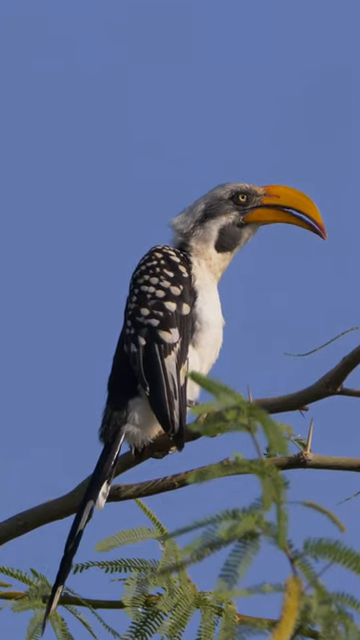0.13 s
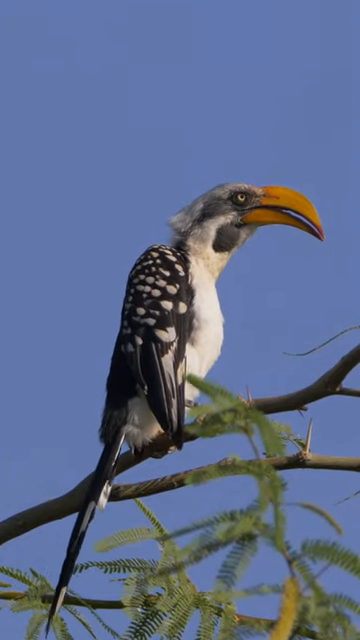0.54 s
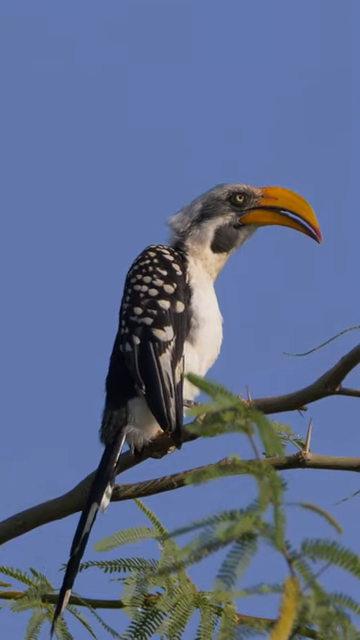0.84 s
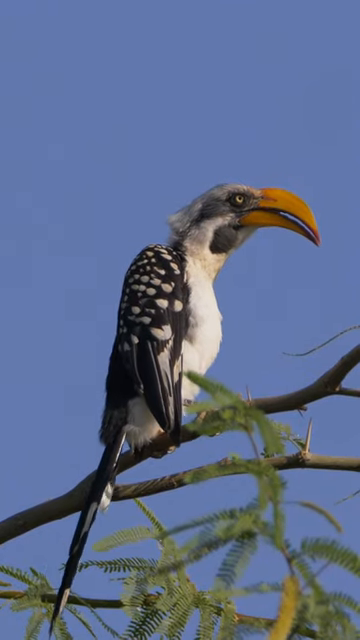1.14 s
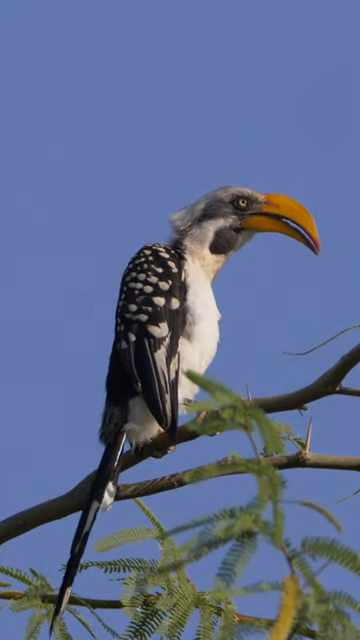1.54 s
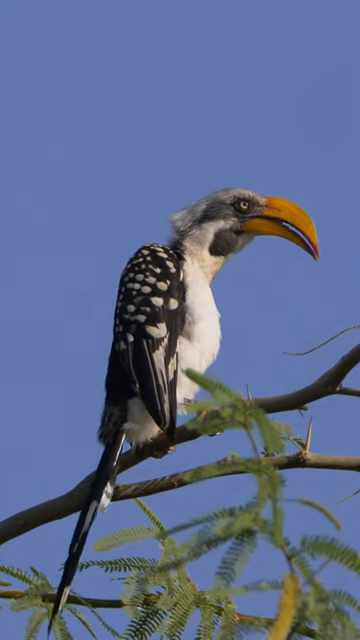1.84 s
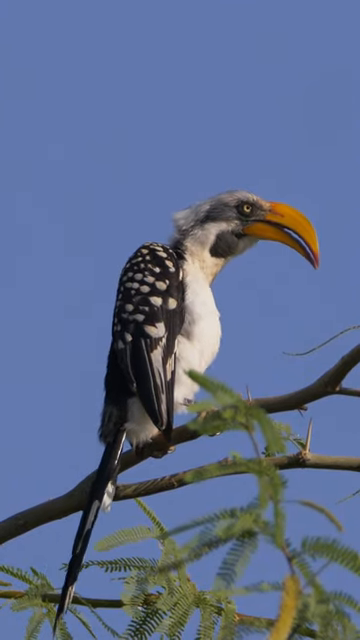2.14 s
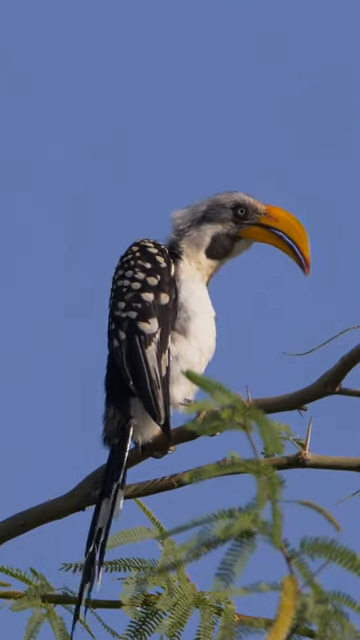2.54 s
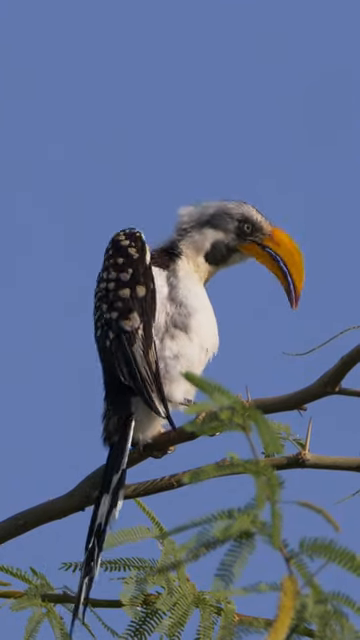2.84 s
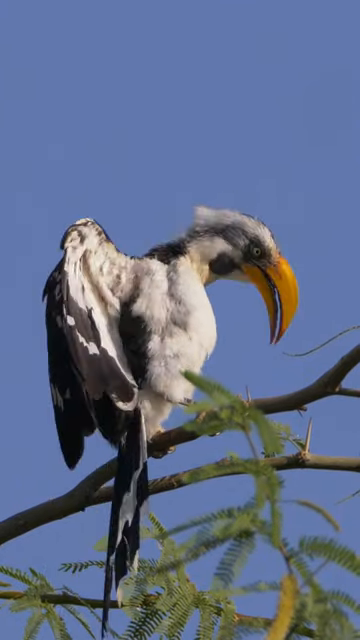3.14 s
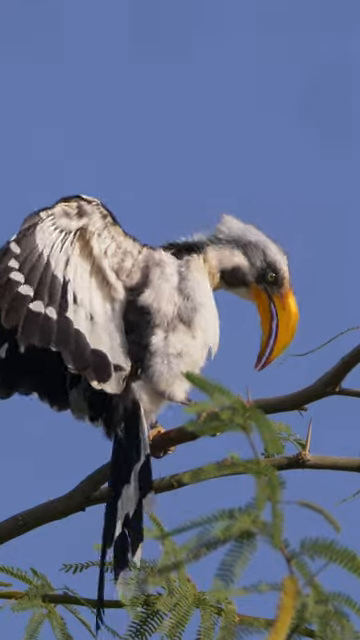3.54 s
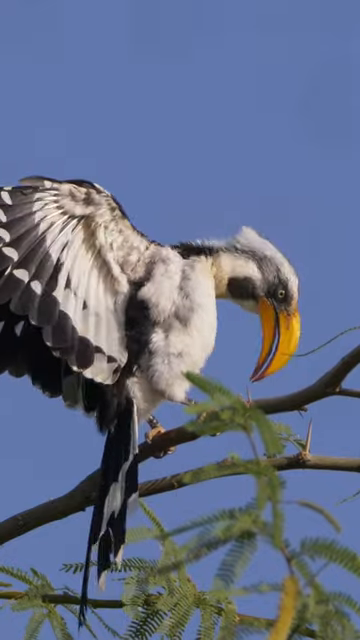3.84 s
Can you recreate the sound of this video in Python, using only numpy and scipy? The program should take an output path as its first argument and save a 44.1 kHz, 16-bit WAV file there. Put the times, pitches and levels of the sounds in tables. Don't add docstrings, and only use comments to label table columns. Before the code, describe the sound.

A hornbill close to the microphone gives hoarse low clucks, about six a second, growing slightly louder; a second, lower and clearer bird joins in, with small birds chirping farther off in open bush.

```python
import sys
import numpy as np
from scipy import signal
from scipy.fft import rfft, irfft
from scipy.io import wavfile
from scipy.ndimage import uniform_filter1d

SR = 44100
rng = np.random.default_rng(int(sys.argv[2]) if len(sys.argv) > 2 else 0)


def inscribe(sig):
    pcm = np.round(np.clip(np.atleast_2d(sig).T, -1, 1) * 32767)
    wavfile.write(sys.argv[1], SR, pcm.astype(np.int16))


def invert_db(x):
    u = np.asarray(x, float) / 20
    return 10 ** u


N = 176400


def at_hz(points, hz):
    curve_hz, curve_db = np.array(points)[:, 0], np.array(points)[:, 1]
    return np.interp(np.log(hz + 1), np.log(curve_hz), curve_db, right=-70)


def over_time(points):
    return np.interp(np.arange(N) / SR, *np.transpose(points))


def rms_one(x):
    return x / np.sqrt(np.mean(x ** 2) + 1e-20)


def coloured(points, size):
    hz = np.fft.rfftfreq(size, 1 / SR)
    spectrum = rfft(rng.standard_normal(size)) * invert_db(at_hz(points, hz))
    return rms_one(irfft(spectrum, size))


def drift(hz, size):
    return coloured([(1, 0), (hz, 0), (4 * hz, -30)], size)


def add(out, s, x):
    i = int(s * SR) + np.arange(len(x))
    keep = (i >= 0) & (i < N)
    out[i[keep]] += x[keep]


def echoes(x, t60, bend=1):
    t = np.arange(SR) / SR
    decay = invert_db(-60 * (t / t60) ** bend)
    onset = np.minimum(t / .015, 1)
    tail = rng.standard_normal(SR) * decay * onset * invert_db(2.5 * drift(40, SR))
    return signal.fftconvolve(x, tail / np.sqrt(np.sum(tail ** 2)))[:N]


OPENING_DB, EFFORT_DB, LOWS_THIN_DB = 8.0, 5.0, 14
THROAT_RISE, THROAT_VARIES = .2, .05


def membrane(pitch, throat, u, shape, jitter, shimmer_db, odd_db=0):
    slot = 8192
    wobble, flutter = drift(80, slot)[:len(u)], drift(50, slot)[:len(u)]
    phase = 2 * np.pi * np.cumsum(pitch * (1 + jitter * wobble)) / SR + rng.uniform(0, 5.9)
    k = np.arange(1, 13)[:, None]
    stretch = 1 + THROAT_RISE * (u - .55) + THROAT_VARIES * rng.uniform(-1, 1)
    octaves = np.log2(k * pitch / 800)
    highs = (OPENING_DB * (u - .5) - EFFORT_DB * (1 - shape)) * np.maximum(octaves, 0)
    lows = LOWS_THIN_DB * (1 - shape) * np.minimum(octaves, 0)
    gains = invert_db(at_hz(throat, k * pitch / stretch) + highs + odd_db * (k % 2) + lows)
    buzz = np.sum(gains * np.sin(k * phase + 0.379 * k * k), axis=0)
    return rms_one(buzz) * invert_db(shimmer_db * flutter)


def cluck_shape(length, swell, fade):
    u = np.linspace(0, 1, int(length * SR))
    shape = u ** swell * (1 - u) ** fade
    return u, shape / shape.max()


def breathe(voice, throat, shape, breathy_db):
    power = uniform_filter1d(voice ** 2, size=400)
    even = rms_one(voice / (power + .05) ** .25)
    return shape * (even + invert_db(breathy_db) * shape * coloured(throat, 8192)[:len(shape)])


# (start [s], length [s], level [dB], top pitch [Hz])
HOARSE_CLUCKS = [(-.045, 0.062, -25.5, 290), (.116, 0.06, -22.5, 289), (.281, 0.055, -23, 290.5),
                 (.445, 0.054, -22.5, 290.7), (.606, 0.056, -22.5, 288.2), (.77, 0.058, -21.5, 294.8),
                 (.93, 0.063, -21.5, 294.1), (1.094, 0.056, -21, 292.8), (1.253, 0.059, -21, 300),
                 (1.418, 0.057, -22, 294.3), (1.578, 0.051, -19, 296.8), (1.737, 0.06, -19, 296.2),
                 (1.9, 0.061, -19, 293.2), (2.058, 0.059, -19.5, 300.4), (2.221, 0.061, -19, 303.4),
                 (2.386, 0.056, -18.5, 301.7), (2.553, 0.055, -17, 287.3), (2.716, 0.07, -18.5, 314.8),
                 (2.888, 0.073, -18.5, 313.4), (3.061, 0.076, -18.5, 326.4), (3.241, 0.072, -18, 334.5),
                 (3.422, 0.076, -19.5, 333.5), (3.605, 0.077, -18, 328.5), (3.793, 0.07, -17, 331),
                 (3.978, 0.057, -23.5, 329)]
# (frequency [Hz], level [dB])
HOARSE_THROAT = [(330, -24), (520, -9.5), (660, 3), (850, 6), (1120, 8), (1450, 0.5), (1750, -24),
                 (3300, -33.5)]
HOARSE_JITTER, HOARSE_SHIMMER_DB, HOARSE_ARCH, ODD_DB = .026, 1.9, .25, -10
SECOND_HZ, SECOND_DB, SECOND_YIELDS_DB = 273.9, -1.5, -4
SLACK_HZ, WARM_S = 45, .7


def hoarse_bird():
    out = np.zeros(N)
    for s, length, db, top in HOARSE_CLUCKS:
        u, shape = cluck_shape(length, swell=1.2, fade=1.15)
        strain = np.clip(top / 40 - 7.2, 0, 1)
        arched = top * (1 - HOARSE_ARCH * (.5 + .5 * strain) * (2 * u - 1.05) ** 2)
        flatter = (SECOND_HZ - SLACK_HZ * (s < WARM_S)) * (1 - 0.033 * u)
        first = membrane(arched, HOARSE_THROAT, u, shape, HOARSE_JITTER, HOARSE_SHIMMER_DB, ODD_DB * strain)
        second = membrane(flatter, HOARSE_THROAT, u, shape, HOARSE_JITTER, HOARSE_SHIMMER_DB)
        voice = first + invert_db(SECOND_DB + SECOND_YIELDS_DB * strain) * second
        add(out, s, invert_db(db) * breathe(voice, HOARSE_THROAT, shape, breathy_db=-11))
    return out


# (frequency [Hz], level [dB per Hz])
RUMBLE_COLOUR = [(25, -38), (70, -3.5), (200, -6), (400, -23), (900, -27), (2000, -28.5)]
AIR_DB, AIR_EASES_DB_PER_S, AIR_SIDE_DB = -48, 4.5, -22
AIR_GUST_DB, BUFFET_DB = 4, 2.5


def air():
    middle, side = coloured(RUMBLE_COLOUR, N), coloured(RUMBLE_COLOUR, N)
    both = middle + invert_db(AIR_SIDE_DB) * side * np.array([[1], [-1]])
    out, edges, buffet = 0, 20 * 2 ** np.arange(8), drift(40, N)
    for low, high in zip(edges, edges[1:]):
        band = signal.sosfilt(signal.butter(2, [low, high], "band", fs=SR, output="sos"), both)
        out = out + invert_db(AIR_GUST_DB * drift(9, N) + BUFFET_DB * buffet) * band
    return invert_db(AIR_DB - AIR_EASES_DB_PER_S * np.arange(N) / SR) * out


# (frequency [Hz], level [dB per Hz])
HISS_COLOUR = [(100, 4.5), (2000, 2), (16000, -3.5)]


def microphone_hiss():
    own = np.array([coloured(HISS_COLOUR, N), coloured(HISS_COLOUR, N)])
    shared = 0.58 * coloured(HISS_COLOUR, N)
    return invert_db(-59 + .5 * np.tanh(drift(13, N))) * (own + shared)


def glides(rows, bend):
    out, waver = np.zeros(N), invert_db(3.2 * drift(120, N))
    for s, length, start, end, db in rows:
        u = np.linspace(0, 1, int(length * SR))
        pitch = start + (end - start) * np.expm1(-bend * u) / np.expm1(-bend)
        tone = np.sqrt(2) * np.sin(2 * np.pi * np.cumsum(pitch) / SR)
        add(out, s, invert_db(db) * np.sin(np.pi * u) ** .6 * tone)
    return out * waver


TREES_T60_S = 0.53
# (time [s], level [dB])
FLOCK_ACTIVITY = [(0, -48.5), (.2, -59), (.4, -51), (.62, -50.5), (.8, -63), (.95, -82), (1.2, -61),
                  (1.33, -46), (1.5, -57.5), (1.7, -66), (1.9, -57.5), (2.2, -60.5), (2.6, -57.5),
                  (3.0, -54), (3.25, -53.5), (3.45, -70), (3.6, -59), (4, -63)]
FLOCK_PER_S, FLOCK_LOW_HZ, FLOCK_HIGH_HZ, FLOCK_DIRECT_DB = 76, 2520, 3700, -7.5


def flock():
    a = rng.random((400, 5))
    start = np.cumsum(2 * a[:, 0]) / FLOCK_PER_S - .5
    length = .015 + .03 * a[:, 1]
    hz = FLOCK_LOW_HZ * (FLOCK_HIGH_HZ / FLOCK_LOW_HZ) ** (a[:, 2] ** 2)
    rows = np.c_[start, length, hz * 1.2, hz * (.7 + .25 * a[:, 3]), -8 * a[:, 4]]
    x = glides(rows, bend=1.05)
    return invert_db(over_time(FLOCK_ACTIVITY)) * rms_one(invert_db(FLOCK_DIRECT_DB) * x + echoes(x, TREES_T60_S))


# (time [s], level [dB])
WIND_SWELLS = [(0, -78), (.15, -51.5), (.45, -52.5), (.7, -59.5), (.9, -86), (1.5, -82), (2.0, -58.5),
               (2.3, -54), (2.8, -83), (3.05, -49), (3.3, -53), (3.6, -65), (4, -70.5)]
# (frequency [Hz], level [dB per Hz])
WIND_COLOUR = [(100, -12.5), (180, -3), (350, -3.5), (480, -5.5), (700, -37.5)]


def wind_in_branches():
    return invert_db(over_time(WIND_SWELLS) + 3.3 * drift(25, N)) * coloured(WIND_COLOUR, N)


# (middle [s], half length [s], level [dB])
LEAF_STIRS = [
    (.13, .08, -60),
    (1.0, .07, -69),
    (1.33, .07, -63),
    (3.2, .04, -62),
    (3.64, 0.047, -71),
]


def leaves():
    t = np.arange(N) / SR
    swell = sum(invert_db(db) * np.exp(-((t - s) / half) ** 4) for s, half, db in LEAF_STIRS)
    return swell * np.array([coloured([(2000, -11), (4000, 3), (16000, -4)], N) for _ in "LR"])


# (start [s], length [s], level [dB], top pitch [Hz])
MATE_CLUCKS = [(.08, 0.02, -33.5, 225.4), (.39, 0.02, -43.5, 216), (.727, 0.025, -38, 208),
               (.994, 0.026, -35.5, 205), (1.203, 0.021, -32.5, 213), (1.388, 0.065, -29.5, 204.2),
               (1.567, 0.066, -26.5, 197.9), (1.755, 0.039, -21.5, 207.1), (1.948, 0.046, -24.5, 215),
               (2.138, 0.044, -24, 209.3), (2.325, 0.063, -22, 213.6), (2.518, 0.061, -21.5, 212.6),
               (2.724, 0.051, -16.5, 222.9), (2.93, 0.066, -19.5, 213.6), (3.14, 0.076, -20, 227),
               (3.358, 0.082, -21, 230.9), (3.583, 0.1, -18, 233.1), (3.803, 0.12, -20, 238.3)]
# (frequency [Hz], level [dB])
MATE_THROAT = [(220, -44), (450, -21), (680, 0), (900, 0), (1130, -18), (1350, -38), (1620, -34),
               (2000, -54)]
# (frequency [Hz], level [dB per Hz])
RASP_COLOUR = [(1250, -28), (1500, -5), (1750, -8.5), (2100, -25.5)]
MATE_JITTER, MATE_SHIMMER_DB, MATE_ARCH, CREAK, RASP_DB = .013, 1.8, .19, 4.0, -17.5
TICK_HZ, TICK_DB, TICK_S, TICK_LEADS_S = 1750, -23, .0025, .005


def mate():
    out = np.zeros(N)
    for s, length, db, top in MATE_CLUCKS:
        u, shape = cluck_shape(length, swell=.75, fade=1.4)
        t = u * length
        tick = np.sin(2 * np.pi * TICK_HZ * t) * (t / TICK_S) * np.exp(1 - t / TICK_S)
        add(out, s, invert_db(db + TICK_DB) * tick)
        creak = 1 + CREAK * u ** 4
        arched = top * (1 - MATE_ARCH * (2 * u - .85) ** 2)
        voice = membrane(arched, MATE_THROAT, u, shape, MATE_JITTER * creak, MATE_SHIMMER_DB * creak)
        voice = voice + invert_db(RASP_DB) * 4.0 * u ** 3 * coloured(RASP_COLOUR, 8192)[:len(u)]
        add(out, s + TICK_LEADS_S, invert_db(db) * breathe(voice, MATE_THROAT, shape, breathy_db=-13))
    return out


# (start [s], length [s], from [Hz], to [Hz], level [dB])
WHISTLES = [(.315, 0.076, 4700, 3400, -43.5), (0.51, 0.04, 5300, 3550, -41), (0.35, 0.087, 1600, 1850, -54),
            (0.94, 0.065, 5800, 1900, -49.5), (1.545, 0.065, 3200, 1800, -39.5),
            (2.325, 0.2, 2550, 2250, -54), (2.345, .07, 4150, 3950, -37.5), (2.385, 0.1, 3900, 2800, -34.5),
            (2.7, 0.2, 2000, 2050, -50.5), (1.4, 0.052, 3800, 3200, -48), (0.69, 0.162, 2480, 2380, -54),
            (1.55, 0.037, 3300, 2300, -38.5), (2, 0.054, 4050, 1500, -44)]


def whistling_birds():
    return glides(WHISTLES, bend=.3)


# (start [s], length [s], from [Hz], to [Hz], level [dB])
STROKES = [(.34, 0.02, 2800, 3700, -48), (.375, .015, 3700, 2340, -53), (.645, 0.012, 6200, 7000, -59),
           (.685, 0.018, 4600, 3900, -57), (1.198, 0.038, 2050, 2950, -52), (1.205, 0.029, 4500, 5250, -51),
           (1.237, 0.025, 6500, 7280, -48), (1.256, 0.029, 7250, 5100, -49),
           (1.318, .025, 2200, 3050, -46.5), (1.36, 0.025, 6000, 4630, -55), (1.365, .018, 3900, 2740, -55),
           (1.415, 0.019, 3000, 3930, -62), (1.43, 0.013, 3200, 3520, -49), (1.72, 0.019, 2700, 5300, -58),
           (1.79, 0.018, 6000, 4700, -51), (1.83, 0.027, 5200, 6600, -57.5),
           (1.83, 0.0034, 4000, 2670, -59), (1.9, .018, 3700, 2560, -53), (1.925, 0.007, 4000, 3260, -45),
           (2.532, 0.032, 3950, 2703, -32.5), (2.812, 0.046, 2700, 3426, -34.5),
           (3.372, 0.025, 5100, 2820, -29), (3.39, 0.065, 5060, 2750, -37.5),
           (3.0, 0.0446, 3150, 2750, -52.5), (3.63, 0.058, 3680, 3630, -58.5),
           (3.765, 0.029, 2150, 2700, -56), (3.812, .02, 2920, 1810, -44)]


def nearer_birds():
    return glides(STROKES, bend=.3)


# (start [s], length [s], from [Hz], to [Hz], level [dB])
CHIRPS = [(.481, 0.007, 5430, 2680, -39), (.518, 0.0177, 5500, 7260, -46.5),
          (.541, 0.018, 5430, 2444, -41.5), (.545, 0.04, 7670, 2820, -42), (1.01, 0.042, 2710, 3510, -50),
          (1.012, 0.013, 3980, 5160, -53.5), (1.228, 0.0043, 2800, 6430, -40),
          (1.284, 0.03, 7200, 4500, -50.5), (1.785, 0.02, 5670, 2450, -39), (1.876, 0.022, 5720, 2810, -42),
          (2.048, 0.05, 3700, 2980, -48.5), (2.512, 0.039, 2880, 1557, -45),
          (2.536, 0.024, 6050, 4880, -53), (2.618, 0.115, 2880, 3982, -31), (2.738, 0.069, 3900, 2770, -34),
          (2.88, 0.029, 5820, 4330, -37), (3.14, .03, 5600, 4220, -50), (3.371, 0.022, 5354, 2765, -41),
          (3.395, 0.03, 4780, 2950, -48.5), (2.815, 0.025, 5270, 4200, -49)]


def chirping_birds():
    return glides(CHIRPS, bend=2.6)


# (start [s], length [s], level [dB])
TWITTERS = [
    (0.546, 0.12, -58),
    (1.287, 0.098, -59.5),
    (1.798, 0.15, -72),
]


def twitter():
    rows = []
    for s, length, db in TWITTERS:
        for k, a in enumerate(rng.random((10, 5))):
            start = s + length * (k + a[0]) / 10
            from_hz, to_hz = 3800 + 3600 * a[2], 2200 + 2800 * a[2] * a[3]
            rows.append((start, 0.081 + 0.0091 * a[1], from_hz, to_hz, db - 6 * a[4]))
    x = glides(rows, bend=1.5)
    return x + invert_db(3) * echoes(x, .2)


def scene():
    pair = hoarse_bird() + mate()
    whistles, strokes, chirps = whistling_birds(), nearer_birds(), chirping_birds()
    small = chirps + strokes + invert_db(-10) * whistles + flock() + twitter()
    small = small + invert_db(-2.5) * echoes(chirps + whistles + invert_db(-3.5) * strokes, TREES_T60_S)
    side = invert_db(-41.5) * echoes(pair, .03) + invert_db(-22.5) * echoes(small, .03)
    birds = pair + invert_db(-17.5) * echoes(pair, 0.095) + small + side * np.array([[1], [-1]])
    return birds + air() + wind_in_branches() + leaves()


def roll_off(x):
    return signal.sosfilt(signal.butter(12, 15880, fs=SR, output="sos"), x)


def record(dry):
    mix = dry + microphone_hiss()
    return roll_off(mix)


dry = scene()
out = record(dry)
inscribe(out)
```